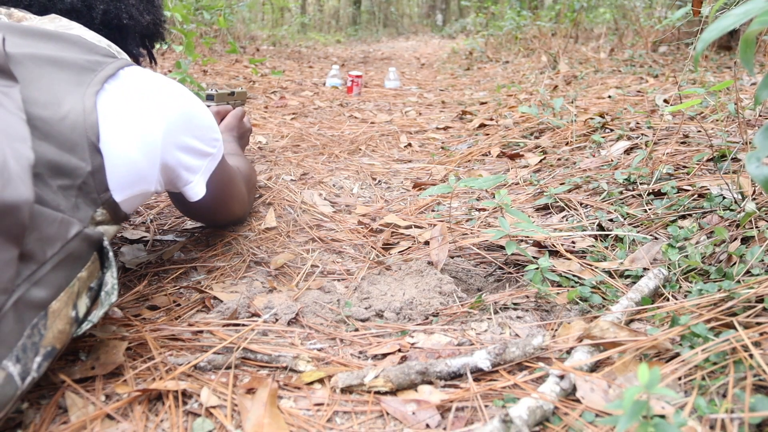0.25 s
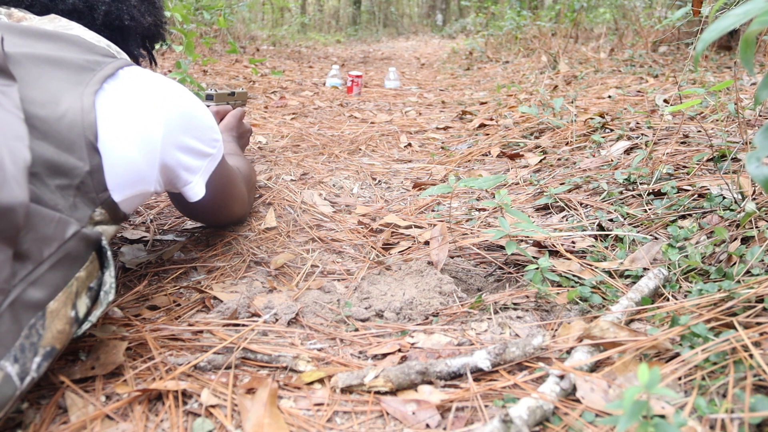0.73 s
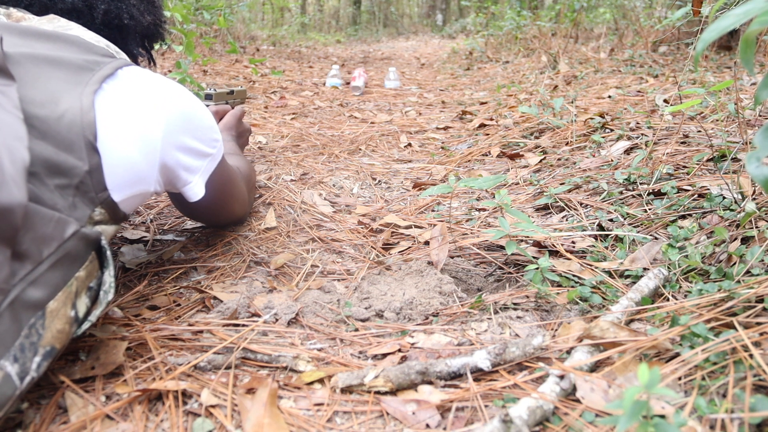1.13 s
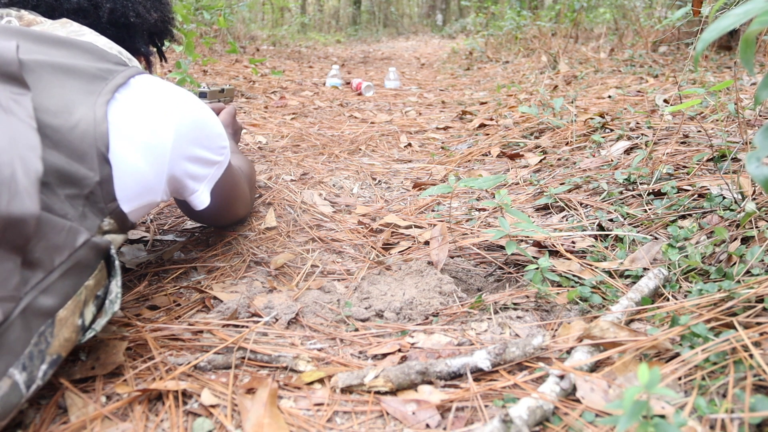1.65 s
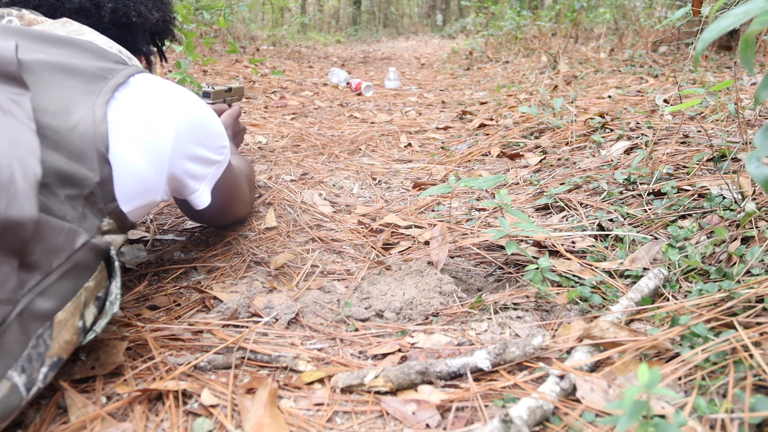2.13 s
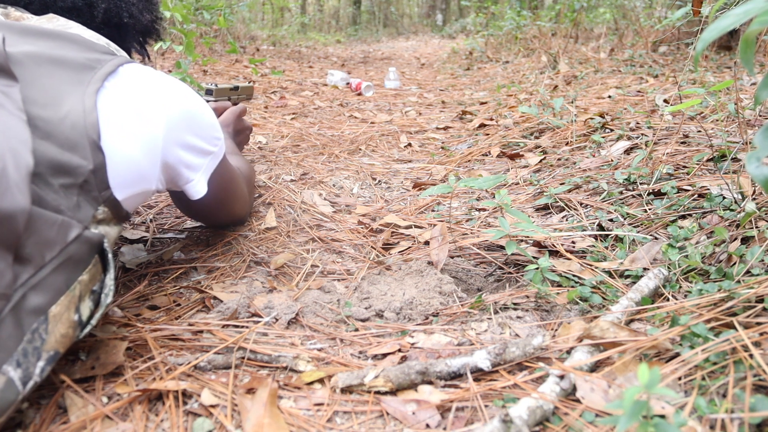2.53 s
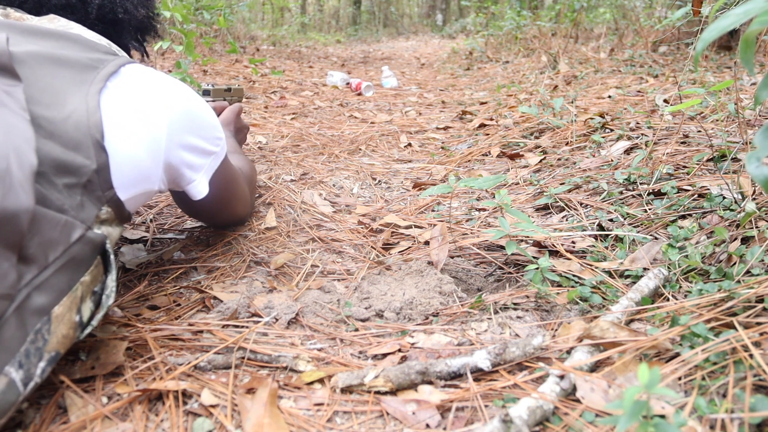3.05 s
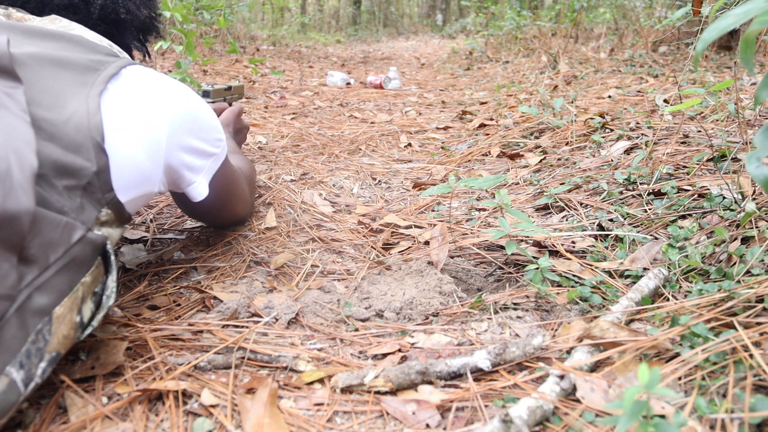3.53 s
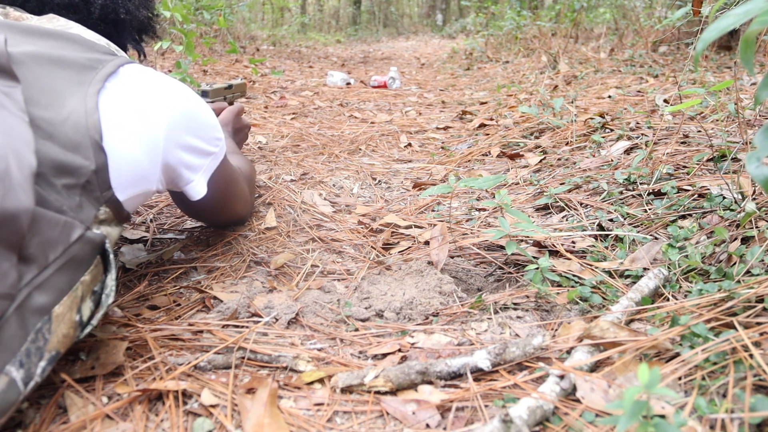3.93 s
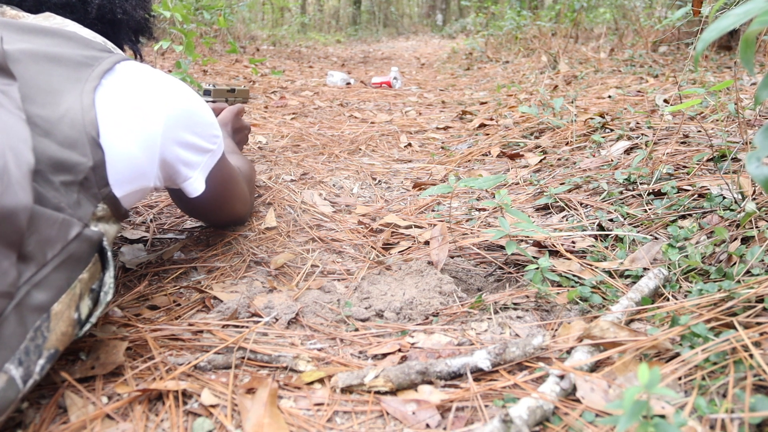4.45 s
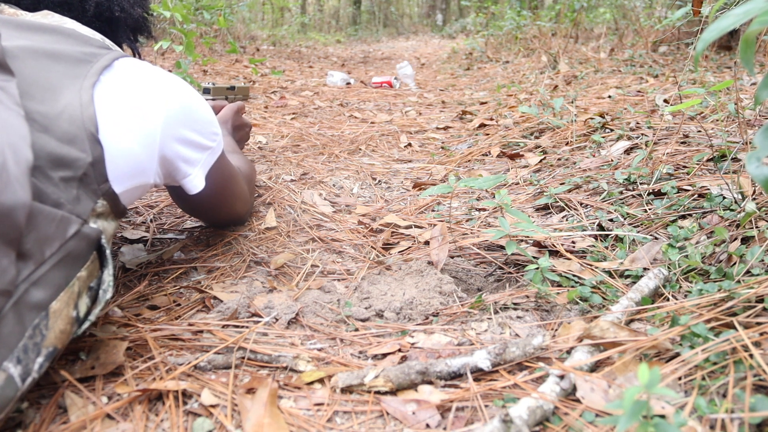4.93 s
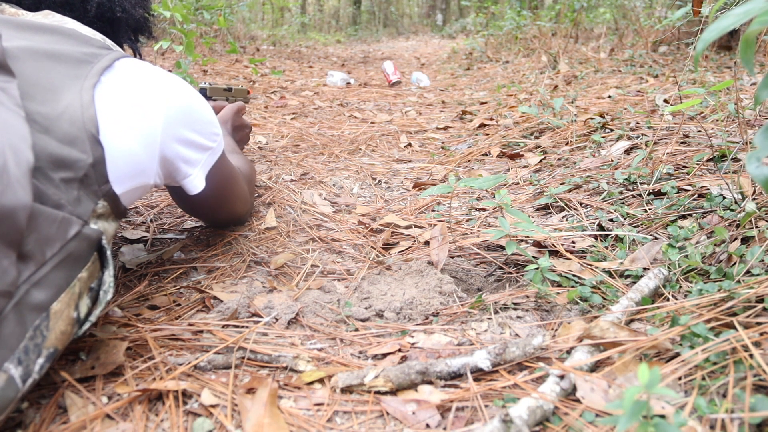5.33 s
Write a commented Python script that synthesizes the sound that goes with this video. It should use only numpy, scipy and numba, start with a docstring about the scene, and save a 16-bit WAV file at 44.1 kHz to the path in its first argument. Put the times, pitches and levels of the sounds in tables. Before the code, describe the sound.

A gas airsoft pistol close to the microphone fires three spaced shots, then a quick string of ten. Each is a sharp, slightly distorted pop with a puff of gas, and the trigger clicks with a small springy twang between them. Pellets dent and ring drink cans a few metres away or tick into dry leaves. The surrounding woods return a bright, hissy echo over a faint distant rumble.

```python
"""Airsoft pistol in the woods

A gas airsoft pistol, close by on a woodland trail, fires three single shots and then a string of ten.
Each shot is a puff of gas and a knock on the frame; the trigger clicks and its spring twangs.
Pellets dent and topple drink cans a few metres off or tick into dry leaves, and the trees scatter
a bright echo over a distant rumble. The shots overload a limiter (an automatic volume control),
which turns the sound down too late to stop clipping and recovers more slowly the busier it gets."""
import sys
import numpy as np
from scipy import signal
from scipy.fft import rfft, irfft, next_fast_len
from scipy.io import wavfile
from scipy.ndimage import uniform_filter1d
from numba import njit

SR = 44100
rng = np.random.default_rng(int(sys.argv[2]) if len(sys.argv) > 2 else 0)


def transcribe(signal):
    """Save signal, clipped to [-1, 1], as a 16-bit WAV file at the path in sys.argv[1]."""
    frames = np.atleast_2d(signal).T
    limited = np.clip(frames, -1, 1)
    pcm = np.round(limited * 32767).astype(np.int16)
    wavfile.write(sys.argv[1], SR, pcm)


N = 246415
T = np.arange(SR // 2) / SR  # time axis of one short sound [s]
RAPID_S = 0.3  # shots closer together than this count as rapid fire

# shots (time [s], level [dB])
SHOTS = [(1.0856, 4.5), (1.9850, 1), (2.733, -0.5), (3.3178, 1), (3.5600, 3.5), (3.7525, 2.5), (3.963, 1.5),
         (4.1615, -1.5), (4.358, 0), (4.5770, 1), (4.7951, 1), (5.005, 3), (5.2255, 3)]
# pellets hitting cans (time [s], blow [dB], dent [Hz], crack [Hz], ring [dB], favoured ring pitch [Hz])
CAN_HITS = [(1.1007, 21.5, 836, 3520, -8, 980), (2.003, 18.5, 520, 2600, -19, 1280),
            (2.7524, 18, 1050, 1940, 9, 560), (3.3338, 20.5, 620, 2450, -1.5, 1780),
            (4.1810, 10, 784, 2700, -17.5, 1100), (4.3762, 20.5, 775, 3600, -1.5, 1010),
            (4.8143, 23, 676, 2800, 9, 617), (5.0230, 27, 740, 3200, 11.5, 2060),
            (5.2429, 22.5, 900, 8600, -9, 1060)]


def undb(db):
    """Turn decibels into a volume factor."""
    return 10 ** (np.asarray(db) / 20)


def add(track, s, sound):
    """Mix a sound into the track, starting at s seconds."""
    i = int(round(s * SR))
    track[i:i + len(sound)] += sound[:len(track) - i]


def fade(t60, t=T):
    """A smooth fade that falls by 60 dB in t60 seconds."""
    return np.exp(-np.log(1000) * t / t60)


def ring(hz, t60):
    """One fading tone of a struck object."""
    return np.sin(2 * np.pi * hz * T) * fade(t60)


def log_bins(size):
    """The log frequency of each slot in a spectrum."""
    return np.log(np.fft.rfftfreq(size, 1 / SR) + 1)


def noise(spectrum, size=len(T)):
    """Noise of strength 1, shaped by points of (frequency [Hz], relative level [dB])."""
    hz, db = np.transpose(spectrum)
    gains = undb(np.interp(log_bins(size), np.log(hz), db))
    shaped = irfft(rfft(rng.standard_normal(size)) * gains, size)
    return shaped / shaped.std()


def crack(hz, t60, low_db=-22, high_db=-16):
    """A short burst of noise; low_db and high_db set its level two octaves below and above hz."""
    return noise([(hz / 4, low_db), (hz, 0), (hz * 4, high_db)]) * fade(t60)


def background(rumble_db=-35, shuffle_db=-40):
    """A distant low rumble, and a few soft shuffles as the shooter settles."""
    # tone of the rumble (frequency [Hz], relative level [dB])
    rumble_spectrum = [(25, -14), (50, -15.5), (82, -0.5), (115, -1.5), (230, -11), (400, -25.5),
                       (600, -28.5), (950, -23), (1550, -30.5), (2050, -39), (4000, -45.5), (6000, -54.5),
                       (10000, -54.5), (15500, -62)]
    out = undb(rumble_db) * noise(rumble_spectrum, size=N)
    for s in (.033, .147, .184, .224):
        shuffle = noise([(250, -13), (560, 8), (850, -1), (1300, -25), (2800, -26), (7000, -64)])
        add(out, s, undb(shuffle_db) * shuffle * fade(0.17))
    return out


def tree_echo(sound, build_s=0.0041, late_db=-21, late_stretch=3.16):
    """Countless trunks scatter the sound back as a hiss; far trees answer faintly for longer."""
    # bands of the echo (centre [Hz], level [dB], fade time [s])
    echo_bands = [(150, -27, 0.22), (432, -30, 0.25), (1020, -24, 0.58), (2680, -31, 0.87),
                  (4180, -19.5, 0.5), (5050, -18.5, 0.42), (10400, -19, 0.34), (14200, -16.5, 0.3)]
    t = np.arange(2 * SR) / SR
    size = next_fast_len(N + len(t))
    source, scatter = rfft(sound, size), rfft(rng.standard_normal(size))
    centres, bins = np.log([row[0] for row in echo_bands]), log_bins(size)
    swell, out = 1 - np.exp(-t / build_s), 0
    for share, (_, db, t60) in zip(np.eye(len(echo_bands)), echo_bands):
        band = np.sin(np.pi / 2 * np.interp(bins, centres, share))
        tail = ((fade(t60, t) + undb(late_db) * fade(t60 * late_stretch, t)) * swell) ** 2
        power = irfft(source * band, size) ** 2
        echo_power = irfft(rfft(power) * rfft(tail / tail.sum(), size), size)  # smeared along the tail
        hiss = irfft(scatter * band, size)
        out = out + undb(db) * np.sqrt(np.abs(echo_power)) * hiss / hiss.std()
    return out[:N]


def echo_clumps(spread_db=-0.38):
    """A slight waver in volume: trunks stand unevenly, so their echo comes back in clumps."""
    return undb(spread_db * noise([(5, 14), (60, 7.5), (200, -29.5), (1000, -78)], size=N))


def leaves(flight_s=0.03, miss_s=0.125, miss_db=-4.5, miss_hz=7500, settle_db=-13, crackles_per_s=130):
    """Dry leaves tick and settle under stray pellets, and crackle under rolling cans."""
    # pellets bouncing into leaves and twigs (time [s], level [dB], pitch [Hz])
    ricochets = [(1.171, 2.5, 8100), (1.205, -5.5, 3600), (1.2490, -9, 2420), (1.3039, -10.5, 6940),
                 (1.493, -13.5, 8300), (2.1422, -12.5, 2800), (2.168, -8, 4170), (2.887, -9.5, 2130),
                 (2.9123, -5.5, 4440), (3.4555, -4.5, 7830)]
    # cans rolling through leaves (start [s], length [s], level [dB])
    rolls = [(1.416, 0.66, -46), (5.445, 0.14, -28.5)]
    out = np.zeros(N)
    onset = 1 - np.exp(-T / 0.00087)  # leaves give way, which softens the start
    # a pellet that hits no can within flight_s lands in the leaves miss_s after the shot
    misses = [(s + miss_s, miss_db, miss_hz) for s, _ in SHOTS
              if not any(s < hit[0] < s + flight_s for hit in CAN_HITS)]
    for s, db, hz in ricochets + misses:
        tick = crack(hz, 0.0098, low_db=-7.5)
        settling = undb(settle_db) * crack(hz, 0.036)
        add(out, s, undb(db) * onset * (tick + settling))
    for start, length, db in rolls:
        for delay, size, pitch in rng.random((crackles_per_s, 3)):
            extra_db = -3.8 * np.log(1 - .98 * size)  # many quiet crackles, a few loud ones
            crackle = undb(db + extra_db) * onset * crack(3500 + 4500 * pitch, 0.018)
            if delay < length and start + delay < N / SR:
                add(out, start + delay, crackle)
    return out


def can_ring(ring_hz, reach=0.15, others_db=-15):
    """The spot where a can is struck decides which tones ring: here, mostly those near ring_hz."""
    # natural tones of a can (pitch [Hz], level [dB], fade time [s])
    can_tones = [(379, -14, 0.14), (745, -5.5, 0.12), (963, -3.5, 0.27), (1073, -3.5, 0.18),
                 (1400, -9.5, 0.015), (1356, -0.5, 0.12), (1510, -15.5, 0.31), (1574, -2, 0.25)]
    out = 0
    for hz, db, t60 in can_tones:
        favoured = np.exp(-(np.log(hz / ring_hz) / reach) ** 2)
        others = undb(others_db) * min(1, ring_hz / hz) ** 2
        out = out + (favoured + others) * undb(db) * ring(hz, t60)
    return out


def crinkle(hz, tail_db=-10):
    """Thin metal buckles with a crack and a short noisy tail."""
    return crack(hz, 0.0099) + undb(tail_db) * crack(hz, 0.048)


def cans(dent_t60=0.004, crack_db=-8, head_on_hz=3200, knock_hz=3400, knock_ring_db=-3.0):
    """Pellets dent the thin cans and set them ringing; toppled cans ring again on the ground."""
    # cans knocking on the ground (time [s], level [dB], favoured ring pitch [Hz])
    knocks = [(1.361, -22, 1310), (1.411, -21, 1270), (1.8215, -29.5, 1390), (1.9123, -35, 1400),
              (5.4865, -9.5, 1900)]
    out = np.zeros(N)
    for s, db, dent_hz, crack_hz, ring_db, ring_hz in CAN_HITS:
        # a glancing blow makes a brighter, louder crack and a shallower dent: 4 dB per octave
        glance_db = 4.0 * np.log2(crack_hz / head_on_hz)
        dent = -undb(db - glance_db) * np.cos(2 * np.pi * dent_hz * T) * fade(dent_t60)
        buckle = undb(db + crack_db + glance_db) * crinkle(crack_hz)
        add(out, s, dent + buckle + undb(ring_db) * can_ring(ring_hz))
    for s, db, ring_hz in knocks:
        add(out, s, undb(db) * (crinkle(knock_hz) + undb(knock_ring_db) * can_ring(ring_hz)))
    return out


def spring(rest_hz=1930, sweep_hz=450, settle_s=0.0041, t60=0.04, rise_s=.001, rattle=0.32, detune=0.018):
    """A coil spring carries high notes fastest, so its twang slides down; the coils rattle as it rings."""
    hz = (rest_hz + sweep_hz * np.exp(-T / settle_s)) * (1 + detune * rng.standard_normal())
    twang = np.sin(2 * np.pi * np.cumsum(hz) / SR)
    shiver = 1 + rattle * noise([(60, 0), (250, 0), (1200, -25), (5000, -60)])
    return twang * shiver * fade(t60) * (1 - np.exp(-T / rise_s))


def lever_click(tick_db=-3, rise_s=0.00044, spread_db=2.7):
    """The trigger's levers meet with a bright tick and ring briefly."""
    # natural tones of the levers (pitch [Hz], level [dB], fade time [s])
    lever_tones = [(2010, -2, 0.053), (2375, -0.5, 0.027), (2736, 5.5, 0.011), (3187, -6.5, 0.063),
                   (4820, -6, 0.026), (7500, -10.5, .035)]
    tones = sum(undb(db + spread_db * rng.standard_normal()) * ring(hz, t60)
                for hz, db, t60 in lever_tones)
    tick = undb(tick_db) * crack(11000, 0.036, low_db=0.5)
    return (tones + tick) * (1 - np.exp(-T / rise_s))


def trigger(twang_db=-2, rapid_click_db=-5, reset_db=-10, pull_s=0.024, pull_db=-25, rattle_db=-25):
    """Pulling and releasing the trigger clicks its levers and twangs its spring."""
    # separate clicks of the trigger (time [s], level [dB])
    clicks = [(0.8253, -23.5), (2.6690, -27), (2.6864, -29), (3.259, -27.5), (3.2754, -32), (5.133, -7)]
    out = np.zeros(N)
    for s, db in clicks:
        add(out, s, undb(db) * (lever_click() + undb(twang_db) * spring()))
    for (last, _), (coming, _) in zip(SHOTS, SHOTS[1:]):
        if coming - last < RAPID_S:
            # the trigger returns about halfway between rapid shots, then loose parts rattle
            reset = last + 0.476 * (coming - last)
            rattles = [(reset + share * (coming - reset), rattle_db + 2.5 * rng.standard_normal())
                       for share in rng.random(4)]
            for s, db in [(reset, reset_db), (coming - pull_s, pull_db)] + rattles:
                add(out, s, undb(db) * (spring() + undb(rapid_click_db) * lever_click()))
    return out


def frame_knock(spread_db=2.0, detune=0.009, tick_db=-3):
    """A blow makes the pistol's frame tick and ring, a little differently each time."""
    # natural tones of the frame, muffled by the hand (pitch [Hz], level [dB], fade time [s])
    frame_tones = [(2210, -5, .018), (2520, -4, .018), (2840, -1, .016), (3590, 0, .017), (3810, -2, .016),
                   (4500, -10, .018)]
    tones = 0
    for hz, db, t60 in frame_tones:
        gain = undb(db + spread_db * rng.standard_normal())
        tones = tones + gain * ring(hz * (1 + detune * rng.standard_normal()), t60)
    return tones + undb(tick_db) * crack(5540, 0.012)


def pistol(scrape_db=-22, gas_db=8, rapid_gas_db=3, valve_open_s=0.0062, leak_db=-11, leak_t60=0.085,
           spring_trip_s=0.023, jolt_db=-5, low_cut_hz=110):
    """The hammer scrapes forward and knocks the valve open: gas bursts out, frame and spring ring."""
    # puffs from the valve, then the muzzle (delay [s], pitch [Hz], fade time [s], level [dB])
    puffs = [(0.0001, 398, 0.003, 20.5), (.003, 500, 0.011, 17)]
    # blows on the frame: hammer catch, release, valve strike, stop, rebound (delay [s], level [dB])
    blows = [(-.0062, -54), (-.0045, -30), (.0008, 14.5), (.0031, 4.5), (.0082, -3.5)]
    # hiss of escaping gas (frequency [Hz], relative level [dB])
    gas_spectrum = [(200, -25.5), (900, -8), (1400, -11), (2500, -3.5), (3800, 0), (5000, -21.5),
                    (7500, -22.5), (10500, -10), (15000, -20.5)]
    out, last = np.zeros(N), -np.inf
    flow = np.exp(-(T / valve_open_s) ** 4) + undb(leak_db) * fade(leak_t60)
    for s, db in SHOTS:
        hiss_db = gas_db + rapid_gas_db * (s - last < RAPID_S)  # rapid shots hiss more
        last = s
        add(out, s + blows[0][0], undb(db + scrape_db) * crack(2700, 0.15, high_db=-16.5))
        add(out, s + .0005, undb(db + hiss_db) * noise(gas_spectrum) * flow)
        for delay, hz, t60, puff_db in puffs:
            add(out, s + delay, undb(db + puff_db) * ring(hz, t60))
        for delay, blow_db in blows:
            add(out, s + delay, undb(db + blow_db) * frame_knock())
        for trip in (1, 2):  # the jolt runs along the spring and back, smeared on the way
            arrival = s + trip * spring_trip_s + .005 * rng.random()
            add(out, arrival, undb(db + jolt_db) * spring(sweep_hz=100, rise_s=0.0039, t60=0.038))
    # such a small source gives off little bass
    return signal.sosfilt(signal.butter(2, low_cut_hz, "high", fs=SR, output="sos"), out)


def scene():
    """Pistol, cans and leaves among the trees, in one channel."""
    gun = pistol() + trigger()
    targets = cans() + leaves()
    direct = gun + targets
    return (direct + tree_echo(direct) * echo_clumps() + background())[None]


@njit
def limiter_cut(over_db, attack_s, hold_s, release_db_per_s, memory_s, busy_db, steepness):
    """How many dB the limiter turns down: it acts fast, holds, then lets go, more slowly when busy."""
    out, cut, busy, wait = np.empty(len(over_db)), 0., 0., 0.
    for i in range(len(over_db)):
        wait -= 1 / SR
        if over_db[i] > cut:
            cut += (over_db[i] - cut) / (attack_s * SR)
            wait = hold_s
        elif wait < 0:
            slowdown = 1 + (busy / busy_db) ** steepness
            cut = max(0., cut - release_db_per_s / SR / slowdown)
        busy += (cut - busy) / (memory_s * SR)  # average of the recent cut
        out[i] = cut
    return out


def record(dry, threshold_db=-4.5, bass_hz=30, top_hz=15900):
    """The limiter acts too late to stop the shots clipping; then deep bass and top treble are cut."""
    sound = dry[0]
    power = uniform_filter1d(sound ** 2, size=44)  # averaged over about 1 ms
    level_db = 10 * np.log10(np.abs(power) + 1e-12)
    cut_db = limiter_cut(level_db - threshold_db, attack_s=0.0011, hold_s=0.042,
                         release_db_per_s=229.5, memory_s=0.83, busy_db=7.0, steepness=3.08)
    clipped = np.clip(sound * undb(-cut_db), -1, 1)
    trimmed = signal.sosfilt(signal.butter(1, bass_hz, "high", fs=SR, output="sos"), clipped)
    return signal.sosfilt(signal.ellip(8, .2, 45, top_hz, fs=SR, output="sos"), trimmed)[None]


dry = scene()
out = record(dry)
transcribe(out)
```